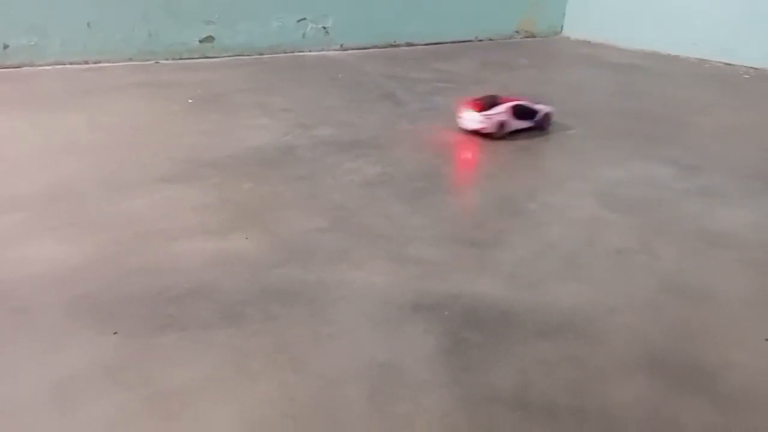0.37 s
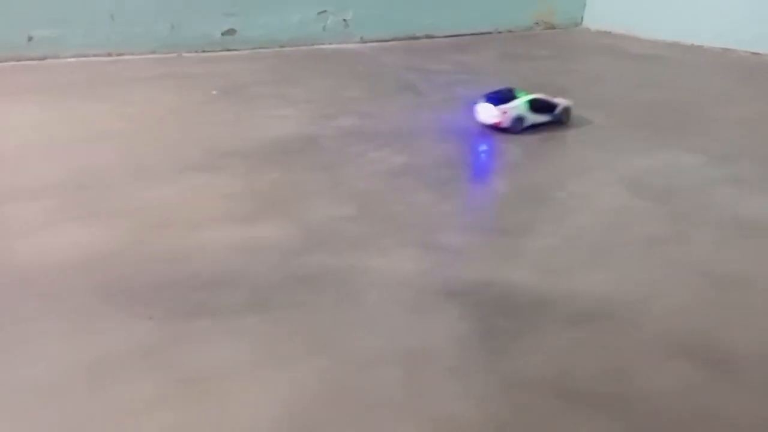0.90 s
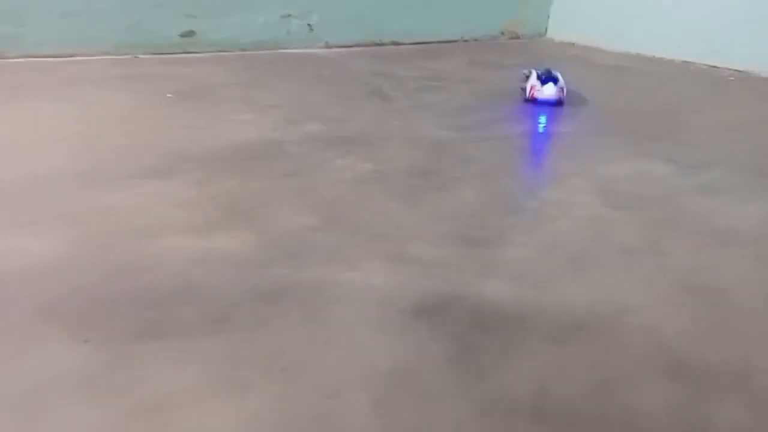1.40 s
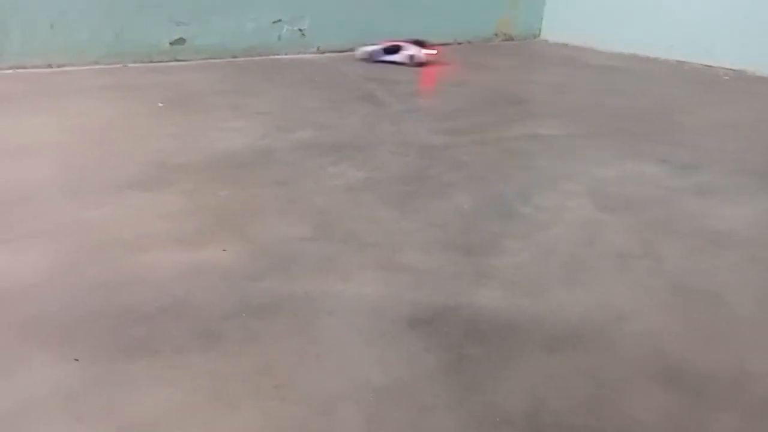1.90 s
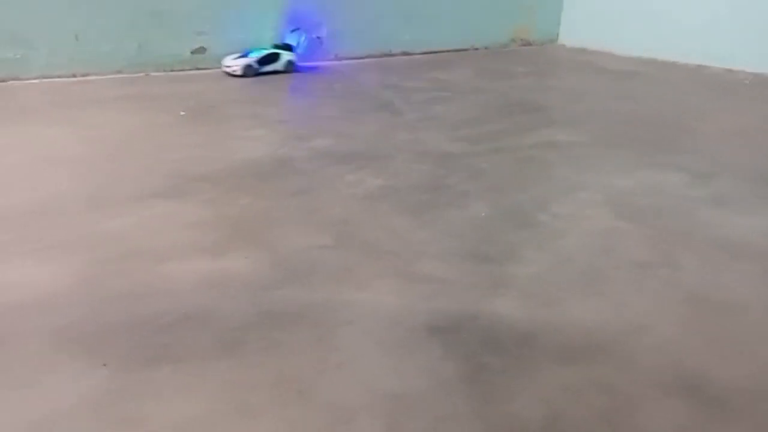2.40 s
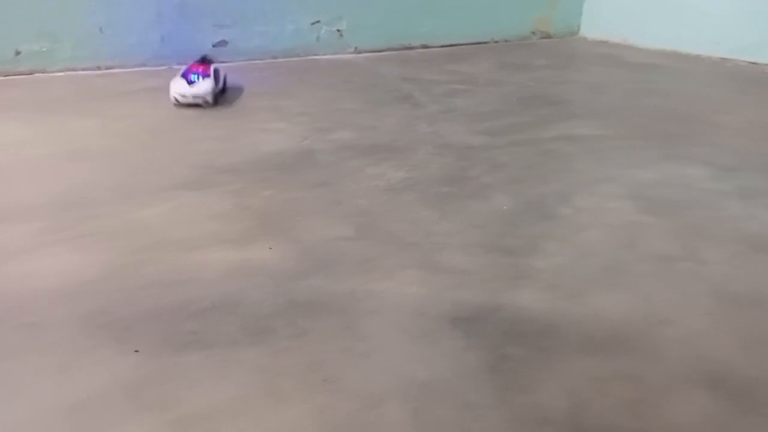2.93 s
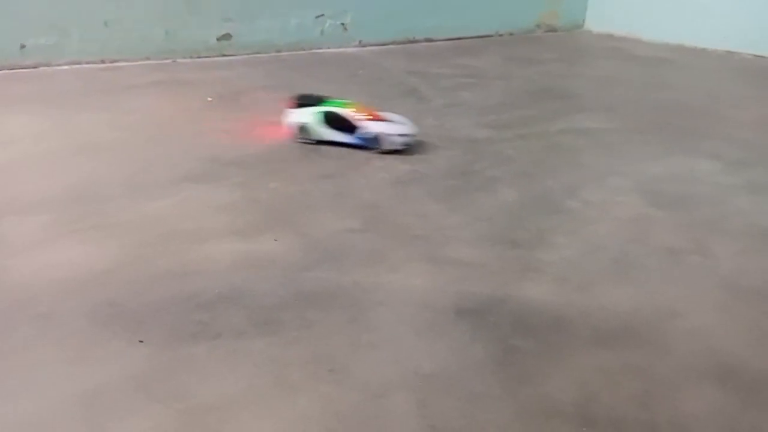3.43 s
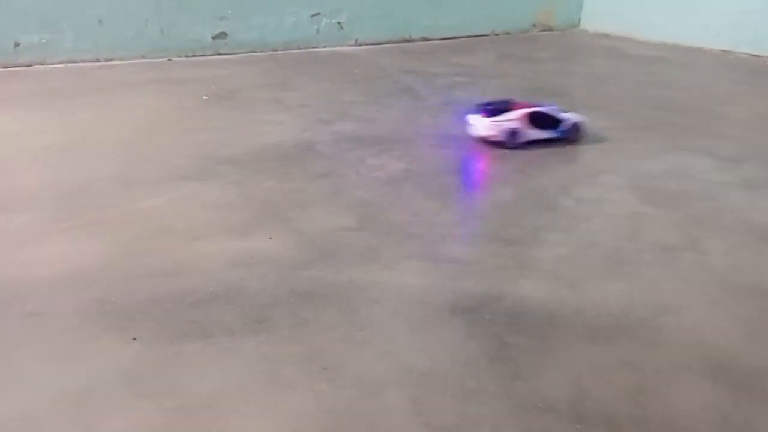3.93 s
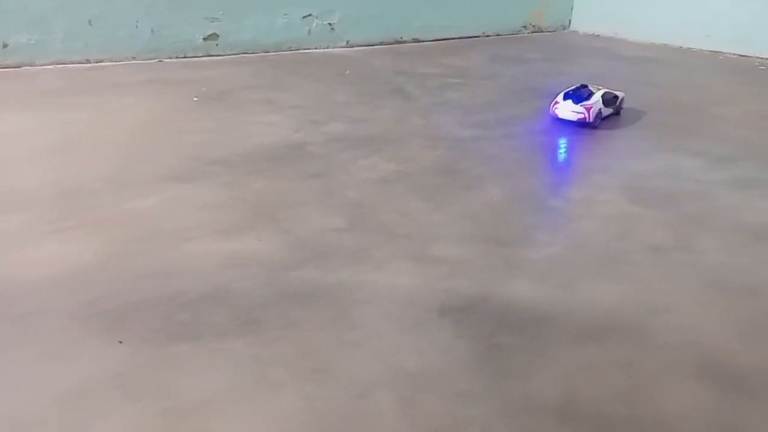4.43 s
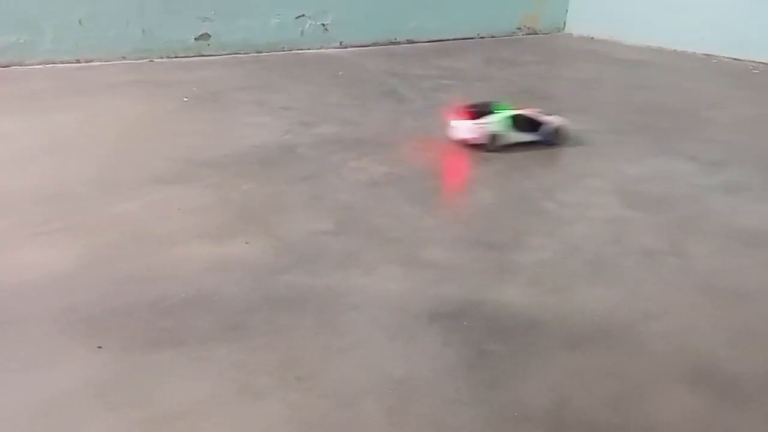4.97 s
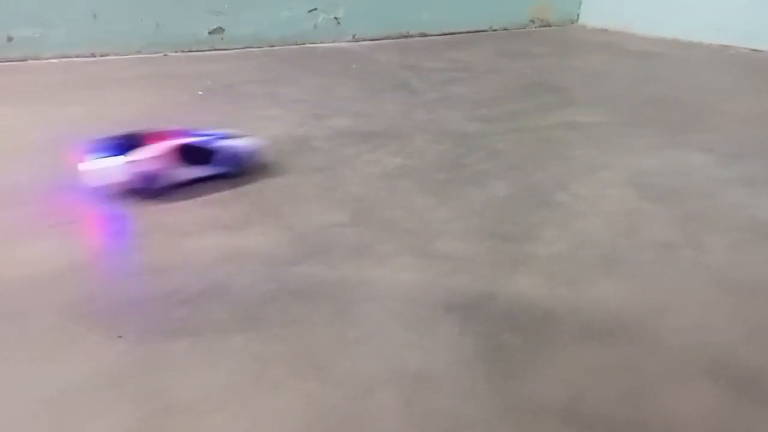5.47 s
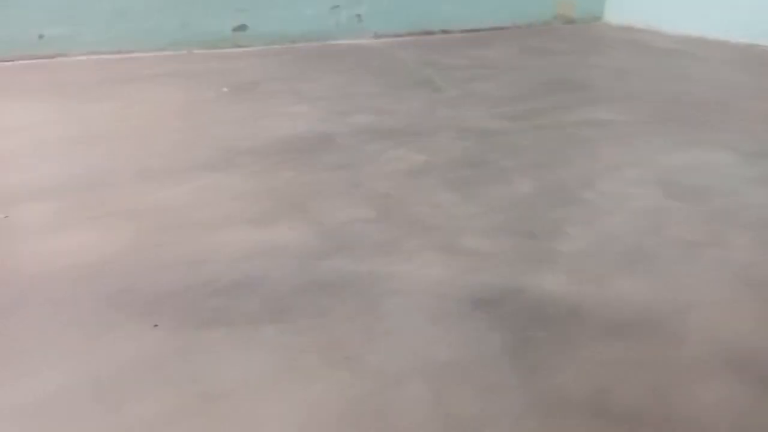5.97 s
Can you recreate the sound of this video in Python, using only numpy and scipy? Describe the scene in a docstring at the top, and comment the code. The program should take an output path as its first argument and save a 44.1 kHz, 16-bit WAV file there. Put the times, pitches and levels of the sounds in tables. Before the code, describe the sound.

In a small bare room with short hard echoes, over faint hiss and a low wavering hum, a plastic toy car's motor and gears whir raspily. The first burst swells until 0.3 s, then drops to quiet; a clack at 0.6 and soft dull taps at 0.7-0.8 follow. From 0.7 to 2.0 it surges, gritty whine climbing, with one very sharp snap at 1.7 that briefly ducks the sound. A clack at 2.0 leads into a fading coast. A strong, rising pull runs 2.5-3.1, then rattling coast to 3.65 and a short burst to 3.9, coasting away by 4.3 with a clack. After a near-quiet gap, double clacks at 4.6-4.8 accompany a new pull, until 5.3. A loud last burst starts about 5.45, its whine sinking until it cuts off near 5.75. Room tone and one faint click at 6.1 remain.

```python
"""Small battery car on a hard floor

A small battery car is driven in bursts over a hard floor in a bare room. Its gear teeth whine at a
pitch that follows the speed, over a rattling whir of noise that rings in the plastic shell.
Short dying noises are the clacks of steering and gears; a drone, a snap and dull taps join in.
Filtered noise makes the room tone, the microphone hiss and a low, wavering hum."""
import sys
import numpy as np
from scipy import signal
from scipy.fft import rfft, irfft, next_fast_len
from scipy.io import wavfile
from scipy.ndimage import uniform_filter1d

SR = 44100
rng = np.random.default_rng(int(sys.argv[2]) if len(sys.argv) > 2 else 0)


def store_wav(level_fs):
    """Save 16-bit WAV to argv[1]."""
    pcm = np.round(np.clip(np.atleast_2d(level_fs), -1, 1) * 32767)
    wavfile.write(sys.argv[1], SR, pcm.T.astype(np.int16))


def decibels_to_gain(level_db):
    """Convert a level in decibels to a linear amplitude gain (20 dB per decade)."""
    exponent = np.asarray(level_db, float) / 20
    return 10 ** exponent


N = 268877   # length in samples

# Car levels are those inside the car, before the room and the mix.
# throttle held: on t/s, off t/s, whir level/dB at the start, whir level/dB it heads for
THROTTLE_PULLS = [(0, 0.312, -28, -19), (0.692, 2.025, -42, -14.5), (2.478, 3.095, -23, -13),
                  (3.671, 3.922, -22.5, -15), (4.577, 5.335, -42.5, -23), (5.447, 5.764, -12.5, -20.5)]
SWELL_S, ENGAGE_DB_PER_S, RELEASE_DB_PER_S = 0.19, 495.5, 154
# rolling on without power: from t/s, stop t/s, whir level/dB at first
COASTS_WITHOUT_POWER = [(2.03, 2.5, -26.5), (3.122, 3.649, -23), (3.936, 4.32, -30.5), (5.322, 5.45, -24)]
COAST_SINK_DB_PER_S, STOP_DB_PER_S, STILL_DB = 16, 299, -59.5

# gears under load: from t/s, to t/s, tooth rate f/Hz at first, f/Hz it heads for,
# whine level/dB against the rattle
GEAR_LOADS = [(.15, .36, 745, 530, -2.5), (.8, 1.1, 335, 1000, -7), (1.1, 2.05, 635, 1000, 0),
              (2.42, 2.51, 430, 450, -2), (2.52, 3.15, 435, 1100, .5), (3.66, 3.79, 450, 560, -2),
              (3.83, 3.96, 585, 720, 0), (5.0, 5.36, 680, 1040, -7), (5.42, 5.53, 822, 770, 3),
              (5.54, 5.76, 750, 245, -6)]
SPEED_LAG_S = .5                   # how slowly the speed follows
BITE_S, LET_GO_S = .02, 0.033      # the whine fades in and out
# overtones of the tooth contact: multiple of the tooth rate, relative level/dB
TOOTH_OVERTONES = [(1, 3), (2, 2.5), (3, 3), (4, 2), (5, 0), (6, 0.5), (7, -6), (8, 0)]
BLUR_HZ = 13                       # spread of the tooth rhythm, multiplied for each overtone
STEADY_SHARE = .1                  # steady part of each overtone, beside a wandering part of spread 1

# colour of the car as the microphone hears it, dark above 7 kHz: f/Hz, relative level/dB
CAR_COLOUR = [(60, -38.5), (200, -12), (300, -22.5), (490, -15), (890, -15.5), (1230, -12.5), (1930, -9.5),
              (2390, -6.5), (2900, -2.5), (4300, -0.5), (5200, -5.5), (6000, -9.5), (7400, -33),
              (8500, -46.5), (11000, -47.5), (13800, -72.5), (14600, -55.5), (15700, -56)]
# resonances of the shell: f/Hz, width/Hz, level/dB for the rattle, level/dB for the whine
SHELL_RESONANCES = [(1057, 96, 8, 6.5), (1240, 330, 6.5, 18.5), (2350, 460, 4.5, 13), (3610, 400, 2, 7),
                    (4330, 220, 3.5, 10), (4614, 340, 5.5, 12)]
# low rattle against the high, at a whir of -18.5 dB; dB gained for each dB of whir
LOW_DB, LOW_FOLLOWS = -11.5, -0.44

# clacks of steering and gears: t/s, level/dB before the microphone, centre f/Hz, width/Hz,
# time to die by 60 dB t/s
CLACK_BLOWS = [(.589, -26, 2150, 250, .22), (.808, -30, 2000, 2500, .08), (.948, -23, 1500, 700, .08),
               (2.013, -19, 1100, 800, .2), (2.348, -23, 3000, 3000, .1), (3.551, -26, 2600, 3000, .1),
               (4.247, -25, 2600, 3000, .15), (4.637, -20, 2900, 2500, .1), (4.770, -19, 3000, 2200, .07),
               (5.318, -22, 1400, 1500, .12), (6.075, -36, 2600, 3000, .12)]
REBOUND_S, REBOUND_DB = .0128, -1.0
# microphone colour heard on the clacks: f/Hz, level/dB
CLACK_MICROPHONE = [(100, 2), (5000, 2), (6200, -5), (7500, -34.5), (9000, -41.5), (15700, -44)]

# drone of the rolling car: t/s, level/dB
DRONE_LEVEL = [(0, -42), (.45, -46.5), (2.8, -43), (3.9, -42), (4.45, -61), (5.02, -43), (5.08, -35.5),
               (5.7, -38), (6, -57)]
DRONE_HZ, DRONE_WIDTH_HZ, DRONE_WAVER_DB = 748.7, 74, 1.5
SNAP_S, SNAP_DB, SNAP_HZ = 1.6897, 8.5, 4400
# soft dull taps close by: t/s, starting level/dB, f/Hz
DULL_TAPS = [(.721, -21, 750), (.722, -24, 1200), (.723, -23, 300), (.748, -27, 350), (.762, -29, 250),
             (.808, -25, 600), (.809, -27, 1100)]
ROOM_T60_S, ROOM_DB = .3, -4.0

# colour of the room tone and microphone hiss: f/Hz, relative level/dB in each Hz
TONE_AND_HISS_COLOUR = [(20, -51), (45, -51), (65, -2), (119, 0.5), (226, -1), (420, -6.5), (760, -5.5),
                        (1080, -9.5), (2200, -6.5), (4400, -12), (6000, -9.5), (7400, -43), (8500, -41.5),
                        (11000, -37.5), (13800, -50), (14600, -40), (15700, -24)]
TONE_AND_HISS_DB = -41
# wavering hum: f/Hz, width/Hz, level/dB, waver/dB
HUM_BANDS = [(118.3, 15, -48.5, 1), (276.4, 7.2, -45.5, 0.5)]
# the lower hum swells once, around this moment
HUM_SWELL_S, HUM_SWELL_LENGTH_S, HUM_SWELL_DB = 4.9, 0.91, 7


def gears():
    """Uneven tooth contacts whine while the motor pulls; loose parts rattle, strongest at each contact."""
    whir_db = effort()
    low_db = LOW_DB + LOW_FOLLOWS * (whir_db + 18.5)
    per_s, pulling, whine_gain = mesh()
    # worn teeth: the pace wobbles
    turn = 2 * np.pi * np.cumsum(per_s * (1 + 0.00587 * drift(30.3))) / SR
    # no two contacts are alike: each overtone is a narrow band of noise, wider higher up
    whine = np.zeros(N)
    for k, db in TOOTH_OVERTONES:
        blur_hz = (k + 2) * BLUR_HZ
        in_step = (STEADY_SHARE + drift(blur_hz)) * np.sin(k * turn)
        quarter_off = drift(blur_hz) * np.cos(k * turn)
        whine += decibels_to_gain(db) * (in_step + quarter_off)
    rattle = rng.standard_normal(N) * (1 + 0.053 * pulling * np.cos(turn))

    peaks = np.array(SHELL_RESONANCES)
    whine = rms_one(colour(whine, CAR_COLOUR, peaks[:, [0, 1, 3]])) * whine_gain
    sound = whine + rms_one(colour(rattle, CAR_COLOUR, peaks[:, :3]))
    sound /= np.sqrt(1 + whine_gain ** 2)   # the whine takes over from the rattle

    low = signal.sosfilt(signal.butter(3, 1750, fs=SR, output="sos"), sound)
    high = signal.sosfilt(signal.butter(3, 1750, "high", fs=SR, output="sos"), sound)
    top = signal.sosfilt(signal.butter(2, 4000, "high", fs=SR, output="sos"), high)
    high = high + (decibels_to_gain(.25 * (whir_db + 21.5)) - 1) * top   # the harder it runs, the brighter
    bumps = decibels_to_gain(1.95 * drift(37) + 0.3 * drift(18))         # wheels hop over the grain of the floor
    low_gain = decibels_to_gain(low_db + 1.1 * drift(20.0))
    return decibels_to_gain(whir_db) * bumps * (rms_one(high) + low_gain * rms_one(low))


def effort():
    """Whir level in dB: each pull moves toward its level and is let go; coasting sinks, then stops."""
    t, power = np.arange(N) / SR, decibels_to_gain(STILL_DB) ** 2
    for on, off, first_db, aim_db in THROTTLE_PULLS:
        held_db = aim_db + (first_db - aim_db) * np.exp(-np.clip(t - on, 0, off - on) / SWELL_S)
        before_db = ENGAGE_DB_PER_S * np.maximum(on - t, 0)
        after_db = RELEASE_DB_PER_S * np.maximum(t - off, 0)
        power += decibels_to_gain(held_db - before_db - after_db) ** 2
    for start, stop, db in COASTS_WITHOUT_POWER:
        sink_db = COAST_SINK_DB_PER_S * (t - start)
        stop_db = STOP_DB_PER_S * np.maximum(t - stop, 0)
        power += (t > start) * decibels_to_gain(db - sink_db - stop_db) ** 2
    return 10 * np.log10(power)


def mesh():
    """Tooth rate drifts toward its goal under each load; also how far the load is on, and whine gain."""
    t, per_s = np.arange(N) / SR, np.full(N, float(GEAR_LOADS[0][2]))
    pulling, gain = np.zeros(N), np.zeros(N)
    for start, end, first, goal, db in GEAR_LOADS:
        still_to_go = np.exp(-np.clip(t - start, 0, end - start) / SPEED_LAG_S)
        per_s = np.where(t >= start, goal + (first - goal) * still_to_go, per_s)
        on = np.interp(t, [start - BITE_S, start, end, end + LET_GO_S], [0, 1, 1, 0])
        pulling, gain = np.maximum(pulling, on), np.maximum(gain, on * decibels_to_gain(db))
    return per_s, pulling, gain


def clacks():
    """Each clack is a blow and its rebound: gritty dying noise ringing around its own centre."""
    out, age = np.zeros(N + SR), np.arange(SR // 2) / SR
    rebound_at = round(REBOUND_S * SR)
    grit = rng.standard_normal((len(CLACK_BLOWS), len(age))) ** 3   # cubing makes the noise spiky
    grit[:, [0, rebound_at]] = 30.0   # the first touch of blow and rebound is the hardest
    for (s, db, hz, width_hz, t60), grains in zip(CLACK_BLOWS, grit):
        dying = decibels_to_gain(-60 * age / max(t60, .01))
        rebound = decibels_to_gain(REBOUND_DB) * np.roll(dying, rebound_at) * (age >= REBOUND_S)
        ringing = resonate(grains * (dying + rebound), hz, width_hz)
        ringing = ringing / np.std(resonate(grains, hz, width_hz))
        out[round(s * SR):][:len(age)] += decibels_to_gain(db) * ringing
    return colour(out[:N], CLACK_MICROPHONE)


def drone():
    """Rolling noise rings one resonance, passed twice to narrow it, at a wavering level."""
    noise = rng.standard_normal(N)
    once = resonate(noise, DRONE_HZ, DRONE_WIDTH_HZ)
    twice = resonate(once, DRONE_HZ, DRONE_WIDTH_HZ)
    level_db = in_time(DRONE_LEVEL)[0] + DRONE_WAVER_DB * drift(7.3)
    return decibels_to_gain(level_db) * rms_one(twice)


def snap():
    """One sharp snap: a few cycles near a bright shell resonance over a short low thud."""
    age = np.arange(N) / SR - SNAP_S
    crack = decibels_to_gain(SNAP_DB) * np.exp(-(age / .0004) ** 2) * np.cos(2 * np.pi * SNAP_HZ * age)
    thud = decibels_to_gain(-8) * np.exp(-((age - .001) / 0.0014) ** 2) * np.sin(2 * np.pi * 500 * age)
    return crack + thud


def taps():
    """Each tap is a sine that dies by 60 dB in 18 ms."""
    out = np.zeros(N)
    for s, db, hz in DULL_TAPS:
        age = np.maximum(np.arange(N) / SR - s, 0)   # before the tap the sine stays at zero
        out += decibels_to_gain(db - 60 * age / 0.018) * np.sin(2 * np.pi * hz * age)
    return out


def room(x):
    """Diffuse tail of bare walls: decaying noise after a first gap of 8 ms."""
    age = np.arange(round(ROOM_T60_S * SR)) / SR
    tail = rng.standard_normal(SR)[:len(age)] * decibels_to_gain(-60 * age / ROOM_T60_S) * (age > .008)
    return signal.fftconvolve(x, tail / np.sqrt(np.sum(tail ** 2)))[:N]


def background():
    """Room tone and microphone hiss are one wavering noise; the hum is noise ringing two narrow bands."""
    noise = rms_one(colour(rng.standard_normal(N), TONE_AND_HISS_COLOUR))
    sound = decibels_to_gain(TONE_AND_HISS_DB + 1.2 * drift(14.0)) * noise
    from_swell_s = np.arange(N) / SR - HUM_SWELL_S
    swell_db = HUM_SWELL_DB * np.exp(-(from_swell_s / HUM_SWELL_LENGTH_S) ** 2)
    for (hz, width_hz, db, waver_db), extra_db in zip(HUM_BANDS, (swell_db, 0)):
        hum = rms_one(resonate(rng.standard_normal(N), hz, width_hz))
        sound += decibels_to_gain(db + extra_db + waver_db * drift(0.86)) * hum
    return sound


def in_time(rows):
    """Columns of a curve at every sample."""
    s, *columns = np.transpose(rows)
    return [np.interp(np.arange(N) / SR, s, c) for c in columns]


def rms_one(x):
    """Scale to rms 1."""
    return x / np.sqrt(np.mean(x ** 2) + 1e-20)


def drift(rate):
    """Random wandering: noise twice through a one-pole low-pass at this rate in Hz; rms 1."""
    r = np.exp(-2 * np.pi * rate / SR)
    return rms_one(signal.lfilter([1], [1, -2 * r, r * r], rng.standard_normal(N + SR))[SR:])


def colour(x, points, peaks=()):
    """Causal (minimum-phase) filter with the given spectrum and resonance humps."""
    size = next_fast_len(N + SR // 4) // 2 * 2
    hz = np.arange(size // 2 + 1) * SR / size + 1
    points_hz, points_db = np.transpose(points)
    level_db = np.interp(np.log(hz), np.log(points_hz), points_db)
    for centre_hz, width_hz, top_db in peaks:
        level_db = level_db + top_db / (1 + (2 * (hz - centre_hz) / width_hz) ** 2)
    # folding the cepstrum makes the filter answer only after its input
    cepstrum = irfft(np.log(decibels_to_gain(np.maximum(level_db, -90))), size)
    cepstrum[1:size // 2] *= 2
    cepstrum[size // 2 + 1:] = 0
    return irfft(rfft(x, size) * np.exp(rfft(cepstrum)), size)[:N]


def resonate(x, hz, width_hz):
    """Two-pole resonance with gain 1 on top."""
    r = np.exp(-np.pi * width_hz / SR)
    edge = (1 - r * r) / 2
    return signal.lfilter([edge, 0, -edge], [1, -2 * r * np.cos(2 * np.pi * hz / SR), r * r], x)


def scene():
    """Car with its room sound, then the snap, the taps and the background without it."""
    car = gears() + drone() + clacks()
    car = (car + decibels_to_gain(ROOM_DB) * room(car)) * decibels_to_gain(-1.0)
    return (car + snap() + taps() + background())[None]


def band_limit(x):
    """A steep low-pass at the top of the band."""
    return signal.sosfilt(signal.butter(12, 15780, fs=SR, output="sos"), x)


def record(dry):
    """A leveller holds loud moments down; an overload ducks the gain, which then recovers; peaks clip."""
    loud_db = 10 * np.log10(uniform_filter1d(dry[0] ** 2, round(0.0078 * SR)) + 1e-12)
    cut_db = uniform_filter1d(np.maximum(loud_db + 11, 0), round(.003 * SR))   # all above -11 dB
    without_rumble = signal.sosfilt(signal.butter(2, 30, "high", fs=SR, output="sos"), dry)
    held = without_rumble * decibels_to_gain(-cut_db)
    # each overload ducks by 7 dB; the duck then shrinks by 60 dB per second
    fall_db = 60.0 * np.arange(N) / SR
    hit_db = np.where(np.abs(held[0]) > 1.2, 7.0, -99)
    duck_db = np.maximum.accumulate(hit_db + fall_db) - fall_db
    gain = decibels_to_gain(-np.roll(np.maximum(duck_db, 0), round(.0005 * SR)))   # acts half a millisecond late
    return band_limit(np.clip(held, -1, 1) * gain)


dry = scene()
out = record(dry)
store_wav(out)
```